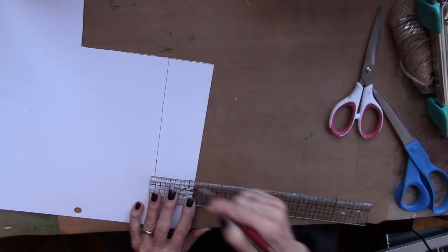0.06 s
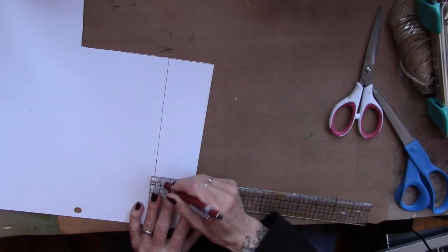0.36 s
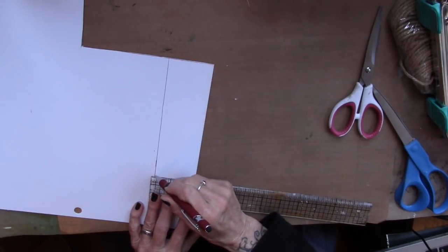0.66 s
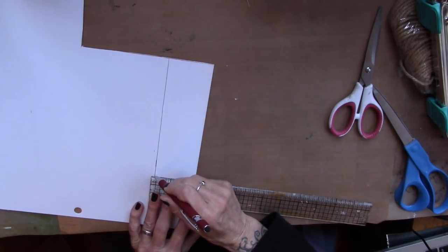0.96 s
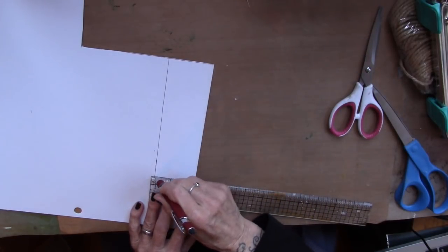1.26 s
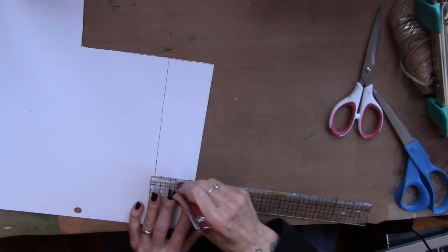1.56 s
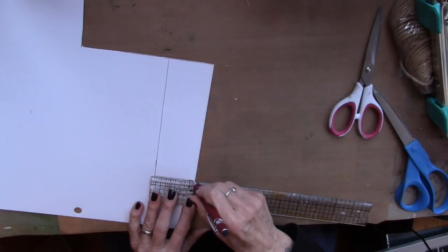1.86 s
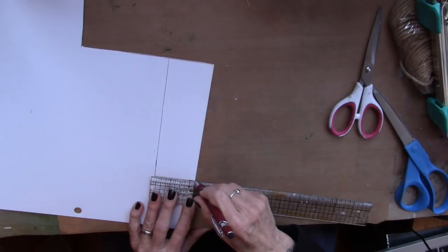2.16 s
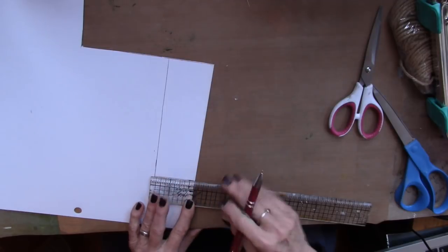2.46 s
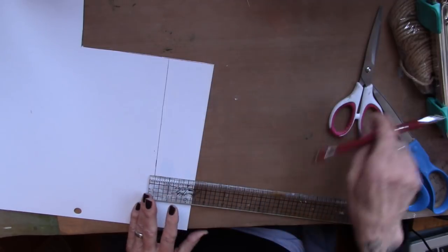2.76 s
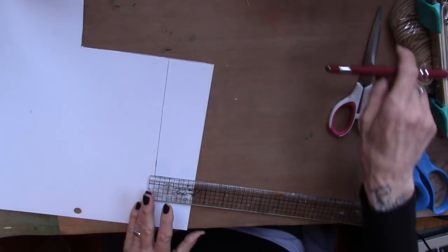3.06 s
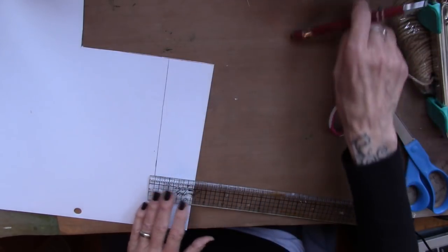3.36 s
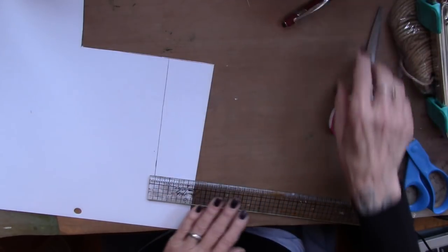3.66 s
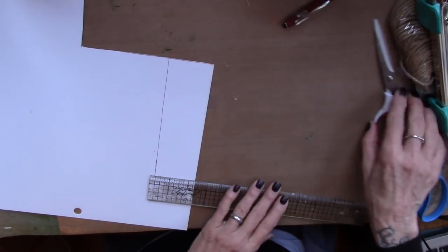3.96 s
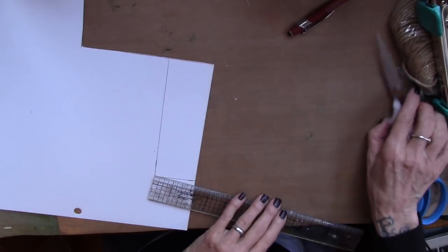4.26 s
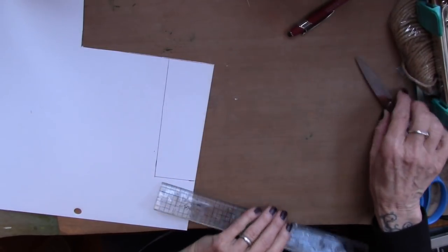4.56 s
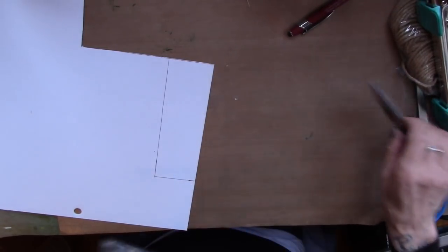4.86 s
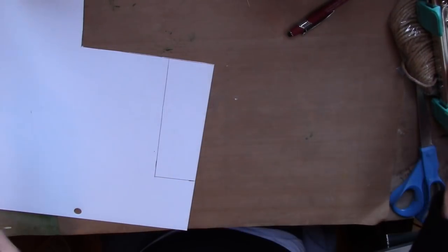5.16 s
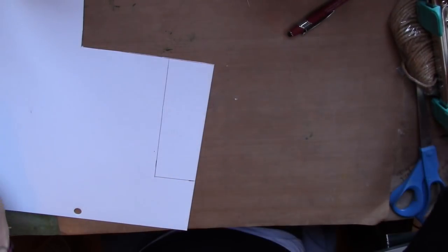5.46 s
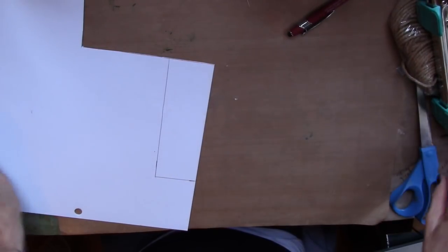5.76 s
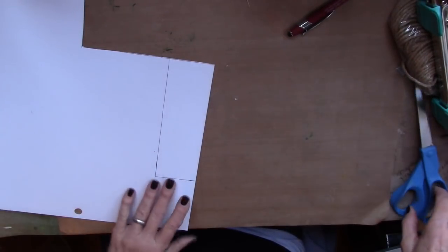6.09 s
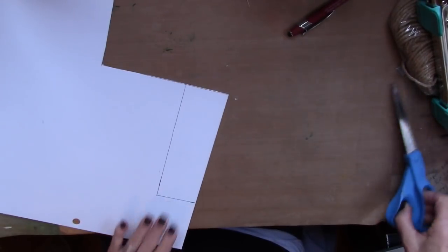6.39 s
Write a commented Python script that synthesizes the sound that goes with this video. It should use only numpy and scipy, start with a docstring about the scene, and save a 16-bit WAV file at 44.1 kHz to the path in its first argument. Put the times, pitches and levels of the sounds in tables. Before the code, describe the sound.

A pen ticks along a ruler and drops on a wooden desk, then scissors and ruler clatter down over a low room hum.

```python
"""A small room hums; close above a wooden desk come faint ticks and the rub of a fingertip on a ruler.
A pen taps along the ruler, draws, and is dropped aside, each impact exciting the modes of pen and desk.
Scissors are dragged away with a rasp of friction, clink against other tools and clatter down, and the
ruler, lifted off, falls and bounces. Last, paper is pushed across the desk with a rustle of tiny slips,
and a second pair of scissors is picked up with a few clicks."""
import sys
import numpy as np
from scipy import signal
from scipy.fft import rfft, irfft
from scipy.io import wavfile
from scipy.ndimage import uniform_filter1d, map_coordinates

SR = 44100
rng = np.random.default_rng(int(sys.argv[2]) if len(sys.argv) > 2 else 0)


def wav_record(signal):
    """Record a signal, one row per channel, as 16-bit PCM in the file named by sys.argv[1]."""
    frames = np.transpose(np.atleast_2d(signal))
    bounded = np.clip(frames, -1, 1)
    # unit amplitude maps onto the largest positive 16-bit level
    quanta = np.round(bounded * 32767).astype(np.int16)
    wavfile.write(sys.argv[1], SR, quanta)


N = 287960
TIME = np.arange(N) / SR
AGE = TIME[:SR // 2]  # time since an impact [s]

# Levels in the tables are relative.
# ventilation noise, and its diffuse share, side minus mid: (frequency [Hz], level [dB])
AIR_SPECTRUM = [(25, -62), (42, -40), (108, -2), (141, -13), (190, -11.5), (223, -15), (355, -14),
                (545, -21), (2000, -33), (2610, -35), (11300, -45.5), (16000, -55.5)]
AIR_SIDE_SPECTRUM = [(30, 10.5), (70, -30.5), (350, -11), (1400, -5.5), (10000, -27)]
# ventilation hum and a thin whine: (frequency [Hz], bandwidth [Hz], level [dB])
HUM_LINES = [(57.8, 9, -66.5), (107.47, 1.8, -58), (120.43, 2.4, -59.5), (164.8, 4.8, -62.5),
             (184.94, 4.14, -57.5), (788, 89, -66.5), (11060, 120, -86)]
# runs of faint ticks, as of a lens motor: (start [s], end [s], level [dB])
TICK_RUNS = [(0.093, 0.17, -65), (0.428, 0.73, -62.5), (0.761, 0.78, -65.5), (1.094, 1.33, -62),
             (1.692, 1.72, -66), (3.363, 3.39, -63.5), (4.117, 4.15, -50.5)]
# pen, ruler and handles tap the desk: (time [s], level [dB])
DESK_TAPS = [(0.871, -54), (1.358, -53), (1.405, -49), (1.4657, -55), (2.535, -33), (3.763, -48),
             (4.183, -29.5)]
# hand and tools knock dully on the desk: (time [s], level [dB], pitch [Hz])
DESK_KNOCKS = [(2.17, -30, 327), (2.979, -40, 392), (3.5162, -18.5, 870), (4.186, -41.5, 970),
               (4.401, -35.5, 580), (4.456, -39, 730), (5.444, -24.5, 530)]
# impacts: (time [s], level [dB], sharpness [dB], accent [Hz])
TOOL_CLICKS = [(2.164, -42, 5, 6000), (2.1712, -41, -5, 2750), (2.503, -40.5, -12.5, 2550),
               (4.212, -42, 3, 8440), (4.275, -47, 3.5, 8000), (4.307, -40, -8.5, 3000),
               (4.358, -31.5, -0.5, 2500), (4.37, -36, -8, 2800), (4.518, -34, -6.5, 2320),
               (4.606, -45, -1.5, 2900), (6.1265, -35, -3, 3413), (6.1735, -43, -3, 3070),
               (6.1885, -35.5, -4, 4100)]
PEN_BOUNCES = [(3.437, -30, -28, 2300), (3.4535, -22.5, -0.5, 2040), (3.4627, -31, 4.5, 2000),
               (3.5128, -27, -2, 2550), (3.5146, -9, -6.5, 2800), (3.5195, -29, 1, 1900)]
BLADE_CLINKS = [(5.0436, -36, -6.5, 1380), (5.2395, -43, 3, 2700), (5.3404, -33.5, -1, 3260),
                (5.409, -44, 3, 3000), (5.424, -37, -13, 2900)]
SCISSOR_BOUNCES = [(5.4505, -23.5, -3.5, 2020), (5.4535, -28.5, -11.5, 3700), (5.468, -35, -2, 2000),
                   (5.4866, -30.5, -7.5, 1900), (5.516, -30.5, -28, 1640), (5.554, -42, -33, 1200)]
RULER_BOUNCES = [(5.6103, -21, -0.5, 3100), (5.6225, -22.5, -11.5, 1380), (5.6425, -27, -24, 1310),
                 (5.6557, -24.5, -6.5, 3040), (5.7252, -24, -6.5, 1280), (5.7485, -37, -1.5, 2900)]
# sliding strokes: (peak time [s], level [dB], rise [s], fall [s], weight [dB])
PEN_STROKES = [(1.44, -61.5, 0.34, 0.23, 5.5), (1.66, -66, 0.22, 0.17, -8),
               (2.55, -47.5, 0.094, 0.052, -5.5)]
DRAG_STROKES = [(2.98, -51.5, 0.022, 0.073, 11), (3.79, -53.5, 0.053, 0.35, -12),
                (3.915, -40.5, 0.085, 0.06, -12.5), (3.98, -46.5, 0.21, 0.028, 5.5),
                (4.19, -44, 0.23, 0.23, -6.5), (4.42, -47.5, 0.089, 0.085, -4.5),
                (4.615, -52, 0.19, 0.074, 2), (4.79, -53.5, 0.041, 0.025, -9)]
BLADE_STROKES = [(5.07, -56, 0.076, 0.1, -25), (5.243, -45, 0.004, 0.16, -27),
                 (5.31, -42.5, 0.068, 0.054, -17), (5.365, -45, 0.017, 0.2, -18),
                 (5.43, -38, 0.058, 0.091, -11)]
PAPER_STROKES = [(6.125, -45.5, 0.055, 0.05, -3.5), (6.195, -41, 0.094, 0.2, -6),
                 (6.248, -44, 0.083, 0.041, -7), (6.355, -46.5, 0.09, 0.076, -7.5)]
# normal modes before contact damping: (frequency [Hz], level [dB], T60 [s])
DESK_MODES = [(171, -5.5, 0.3), (247.4, 2.5, 0.11), (316, 2, 0.1385), (397.4, -0.5, 0.033),
              (530, -5.5, 0.027), (680, -3.5, 0.024), (797, 0.5, 0.058), (886, 5, 0.019)]
PLASTIC_MODES = [(1070, -2, 0.053), (1530, -16, 0.097), (2067, -7.5, 0.045), (2507, -5, 0.17),
                 (2750, -6, 0.048), (3410, 1, 0.011), (5880, -15, 0.016)]
PEN_MODES = [(1740, -6.5, 0.037), (2040, -8.5, 0.0232), (2300, 5, 0.016), (2790, 4, 0.0092),
             (3190, -7.5, 0.031), (5910, -8.5, 0.014), (6750, 2, 0.006), (7700, -0.5, 0.0089)]
BLADE_MODES = [(1352, -6.5, 0.18), (1385, -3.5, 0.24), (2175, -4, 0.02), (2729, 0, 0.04), (2900, -2, 0.022),
               (3840, -9, 0.02), (6740, -9, 0.035), (7542, -7.5, 0.04), (8366, -10, 0.035),
               (9211, -11, 0.045)]
RULER_MODES = [(1112, -4.5, 0.12), (1291, -3.5, 0.08), (1361, -4, 0.07), (1740, 2, 0.05), (1902, -1, 0.04),
               (2288, -2, 0.03), (2740, -1, 0.025), (3305, 2, 0.012), (3800, -2, 0.012), (8500, -1, 0.005)]
# friction noise of tools and of paper: (frequency [Hz], level [dB])
DRAG_SPECTRUM = [(120, -37), (200, -11.5), (320, 4.5), (538, -4), (763, -9), (1050, -15), (3070, -20.5),
                 (8120, -28.5), (11000, -32.5), (16000, -44.5)]
PAPER_SPECTRUM = [(120, -12), (200, 2), (311, 6), (791, -5), (916, -14.5), (4000, -16), (6800, -11.5),
                  (9000, -15), (12200, -19), (16000, -35)]
# resonance of the contact travelling along a blade: (time [s], frequency [Hz])
SQUEAL_PATH = [(5.25, 2700), (5.31, 3045), (5.39, 3330), (5.44, 3060)]
# decay of the reverberation: (frequency [Hz], T60 [s])
REVERB_T60 = [(150, 0.46), (800, 0.28), (3000, 0.3), (7000, 0.3), (15000, 0.16)]
# spectrum of the reverberation: (frequency [Hz], level [dB])
REVERB_SPECTRUM = [(150, -9.5), (700, -7), (1500, -10), (4500, -13), (14000, -11)]


def from_db(db):
    """Amplitude grows tenfold for every 20 dB."""
    return 10 ** (np.asarray(db) / 20)


def rms_one(x):
    """Normalisation to unit mean power."""
    return x / np.sqrt(np.mean(x ** 2) + 1e-20)


def peak_one(x):
    """Normalisation to unit power in the loudest two milliseconds."""
    return x / np.sqrt(uniform_filter1d(x ** 2, size=88, mode="constant").max() + 1e-20)


def at_hz(points, hz):
    """Interpolation on a log-frequency axis."""
    f, value = np.transpose(points)
    return np.interp(np.log(np.maximum(hz, 1)), np.log(f), value)


def cut(x, hz, kind, order=2):
    """Causal Butterworth filtering."""
    return signal.sosfilt(signal.butter(order, hz, kind, fs=SR, output="sos"), x)


def colour(x, spectrum):
    """Filtering by multiplication of spectra."""
    return irfft(rfft(x) * from_db(at_hz(spectrum, np.fft.rfftfreq(N, 1 / SR))), N)


def registers(x, low_hz=1000, high_hz=4500):
    """Band splitting into middle, low and high ranges."""
    middle = cut(x, [low_hz, high_hz], "band", order=3)
    return middle, cut(x, low_hz, "low", order=4), cut(x, high_hz, "high", order=4)


def add(track, s, sound):
    """Superposition: a sound joins the track at time s."""
    at = int(s * SR)
    track[at:at + len(sound)] += sound[:N - at]


def air():
    """Broadband noise: the steady rush of ventilation."""
    return from_db(-52) * rms_one(colour(rng.standard_normal(N), AIR_SPECTRUM))


def hum():
    """Narrowband noise: each line wavers at a rate set by its bandwidth."""
    hz, out = np.fft.rfftfreq(N, 1 / SR), np.zeros(N)
    for centre, width, db in HUM_LINES:
        line = rfft(rng.standard_normal(N)) / (1 + (2 * (hz - centre) / width) ** 2)
        out += from_db(db) * rms_one(irfft(line, N))
    return out


def ticks(centre_hz=2036, width_hz=400, period_s=0.0667, lift_db=4.5, first_lift_db=7.5):
    """A damped resonance is excited periodically, hardest at the start of a run."""
    out = np.zeros(N)
    pip = peak_one(AGE * np.exp(-np.pi * width_hz * AGE) * np.sin(2 * np.pi * centre_hz * AGE))
    for start, end, db in TICK_RUNS:
        for k, s in enumerate(np.arange(start, end, period_s)):
            add(out, s, from_db(db + lift_db + first_lift_db * (k == 0)) * pip)
    return out


def slips(per_s, grain_db, uneven_db=2.5):
    """Stick-slip friction: random impulses whose force wavers as surfaces catch and let go."""
    sizes = rng.standard_normal(N) * from_db(grain_db * np.minimum(rng.exponential(1, N), 3))
    catching = rms_one(cut(rng.standard_normal(N), 24, "low"))
    return (rng.random(N) < per_s / SR) * sizes * from_db(uneven_db * catching)


def swell(s, db, rise_s, fall_s, swing_db=20):
    """Exponential growth and decay: a stroke moves by swing_db over its rise and its fall."""
    away = np.maximum((s - TIME) / rise_s, (TIME - s) / fall_s)
    return from_db(db - swing_db * np.minimum(away, 10))


def finger_rub():
    """Stick-slip of skin on the plastic ruler gives a soft, narrowband rub."""
    rub = rms_one(cut(slips(per_s=1100, grain_db=-1), [540, 750], "band"))
    return swell(s=0.25, db=-48, rise_s=0.044, fall_s=0.041) * rub


def dying_noise(t60_at, db_at=lambda hz: 0):
    """Modal overlap: countless modes merge into noise, each band decaying at its own rate."""
    edges = np.geomspace(90, 18000, num=13)
    white, hz = rfft(rng.standard_normal(len(AGE))), np.fft.rfftfreq(len(AGE), 1 / SR)
    out = 0
    for low, high in zip(edges, edges[1:]):
        centre = np.sqrt(low * high)
        band = irfft(white * (hz >= low) * (hz < high), len(AGE))
        band *= np.exp(-np.log(1000) * AGE / t60_at(centre))
        band_share = np.sqrt(2 * (high - low) / SR / len(AGE))
        out += rms_one(band) * band_share * from_db(db_at(centre))
    return out


def ring(modes, held_t60, scatter_db=2):
    """Free vibration is a sum of damped modes; a support adds its decay rate to theirs."""
    hz, db, t60 = np.transpose(modes)[:, :, None]
    strength = from_db(db + scatter_db * rng.standard_normal(hz.shape)) * rng.choice([-1, 1], hz.shape)
    decay = np.exp(-np.log(1000) * AGE * (1 / t60 + 1 / held_t60))
    return np.sum(strength * np.sin(2 * np.pi * hz * AGE) * decay, axis=0)


def accent(x, centre_hz, band_db, octaves=0.35):
    """Selective excitation: the point of contact favours the modes around one pitch."""
    edges = centre_hz * 2 ** (octaves * np.array([-.5, .5]))
    return x + from_db(band_db) * cut(x, edges, "band", order=1)


def desk(tilt_db, rise_s=0.0024):
    """The desk is a sounding board; hard contact tilts its modes upward by tilt_db per octave."""
    modes = [(hz, db + tilt_db * np.log2(hz / DESK_MODES[0][0]), t60) for hz, db, t60 in DESK_MODES]
    wood = peak_one(cut(dying_noise(lambda hz: .07), [180, 1000], "band", order=3))
    tone = peak_one(ring(modes, held_t60=0.43, scatter_db=0))
    return peak_one((tone + from_db(-5) * wood) * (1 - np.exp(-AGE / rise_s)))


def impacts(rows, modes, held_t60, crunch_t60, crunch_db, snap_db, accent_db, top_hz, desk_db, tilt_db):
    """Impulse response: a tool snaps, crunches and rings; the desk answers slowly, in proportion."""
    out = np.zeros(N)
    for s, db, sharpness_db, accent_hz in rows:
        crunch = dying_noise(lambda hz: crunch_t60 * (hz / 3000) ** -.35)
        tool = peak_one(ring(modes, held_t60)) + from_db(crunch_db) * peak_one(crunch)
        # rough surfaces meet at several points within a millisecond
        tool += from_db(snap_db) * peak_one(rng.standard_normal(len(AGE)) * np.exp(-AGE / 0.00093))
        # a sharper contact is shorter and reaches higher
        reach_hz = min(top_hz * 2 ** (0.22 * sharpness_db), 18000)
        body, _, crack = registers(cut(accent(tool, accent_hz, accent_db), reach_hz, "low"))
        blow = peak_one(body) + from_db(sharpness_db) * peak_one(crack)
        add(out, s, from_db(db) * (blow + from_db(desk_db) * desk(tilt_db)))
    return out


def taps(sharpness_db=-6, accent_hz=1700):
    """Hard contact: tapping plastic drives the upper modes of the desk."""
    rows = [(s, db, sharpness_db, accent_hz) for s, db in DESK_TAPS]
    return impacts(rows, PLASTIC_MODES, held_t60=0.055, crunch_t60=0.037, crunch_db=3, snap_db=-9,
                   accent_db=7.5, top_hz=11800, desk_db=-0.5, tilt_db=19)


def slide(strokes, friction, hiss_db):
    """Incoherent strokes add in power; weight on the desk raises rumble and dulls hiss."""
    power = 0
    for s, db, rise_s, fall_s, weight_db in strokes:
        shares = from_db([[0], [weight_db], [hiss_db - 0.84 * weight_db]])  # rasp, rumble, hiss
        power += (shares * swell(s, db, rise_s, fall_s)) ** 2
    return sum(rms_one(part) * gain for part, gain in zip(registers(friction), np.sqrt(power)))


def pen_line():
    """Sliding friction: the pen draws a line, then scrapes off the ruler."""
    return slide(PEN_STROKES, colour(slips(per_s=3000, grain_db=-0.5), DRAG_SPECTRUM), hiss_db=-11.5)


def clicks():
    """Weak coupling: light clicks of tool on tool, and a few sharp nail ticks, hardly move the desk."""
    return impacts(TOOL_CLICKS, PLASTIC_MODES, held_t60=0.018, crunch_t60=0.032, crunch_db=9,
                   snap_db=-24, accent_db=4.5, top_hz=9300, desk_db=-8.5, tilt_db=-3)


def knocks(desk_low_hz=151):
    """Soft contact is a low-pass filter: a thud and a dull brush, with little above their pitch."""
    out = np.zeros(N)
    for s, db, pitch_hz in DESK_KNOCKS:
        brush = from_db(9) * peak_one(dying_noise(lambda hz: .05))
        thud = accent(desk(tilt_db=2.5) + brush, pitch_hz, band_db=-0.5)
        add(out, s, from_db(db) * peak_one(cut(thud, [desk_low_hz, 1.47 * pitch_hz], "band", order=4)))
    return out


def drag():
    """Fine slips merge into a swish as scissors, ruler and sleeve glide over wood."""
    friction = colour(slips(per_s=14000, grain_db=1, uneven_db=1.5), DRAG_SPECTRUM)
    return slide(DRAG_STROKES, friction, hiss_db=-11.5)


def pen_drop():
    """Each rebound of the pen excites its modes anew."""
    return impacts(PEN_BOUNCES, PEN_MODES, held_t60=0.0724, crunch_t60=0.17, crunch_db=-22, snap_db=2,
                   accent_db=4.5, top_hz=13270, desk_db=-14.5, tilt_db=2)


def chatter(bounces, delay_s, fall_s, level_db, weight_db):
    """Each bounce sets off a short stroke in proportion to its amplitude."""
    return [(s + delay_s, db + level_db, delay_s, fall_s, weight_db) for s, db, *_ in bounces]


def skids():
    """Friction follows impact: the pen rolls and the scissors skid."""
    pen = chatter(PEN_BOUNCES, delay_s=0.024, fall_s=0.09, level_db=-32.5, weight_db=4)
    scissors = chatter(SCISSOR_BOUNCES, delay_s=0.0049, fall_s=0.1, level_db=-12, weight_db=-2.5)
    return slide(pen + scissors, colour(slips(per_s=4300, grain_db=-7), DRAG_SPECTRUM), hiss_db=-22.5)


def scraped(modes, rasp_db, top_hz, waver_s=0.00005, waver_hz=40):
    """Forced vibration: friction keeps a tool's modes singing; a changing grip wavers their pitch."""
    friction = slips(per_s=4900, grain_db=-2)
    driven = signal.fftconvolve(friction, ring(modes, held_t60=.15, scatter_db=0))
    warp = waver_s * rms_one(cut(rng.standard_normal(N), waver_hz, "low", order=4))
    singing = rms_one(map_coordinates(driven, [(TIME + warp) * SR], order=3))
    rasp = from_db(rasp_db) * rms_one(colour(friction, DRAG_SPECTRUM))
    return cut(singing + rasp, top_hz, "low")


def blade_scrape(width_hz=390):
    """Steel on steel: the blades sing, and a resonance follows the moving contact point."""
    centre_hz = np.interp(TIME, *np.transpose(SQUEAL_PATH))
    carrier = np.cos(2 * np.pi * np.cumsum(centre_hz) / SR)
    squeal = rms_one(cut(rng.standard_normal(N), width_hz / 2, "low") * carrier)
    blades = rms_one(scraped(BLADE_MODES, rasp_db=6, top_hz=11400))
    return slide(BLADE_STROKES, blades + from_db(-12) * squeal, hiss_db=-20.5)


def clinks():
    """Light damping: free blades ring on after a touch."""
    return impacts(BLADE_CLINKS, BLADE_MODES, held_t60=0.44, crunch_t60=0.079, crunch_db=-1.5,
                   snap_db=-10, accent_db=-4.5, top_hz=7500, desk_db=-24, tilt_db=-2)


def clatter():
    """Contact damping: the desk stills the blades as the scissors land."""
    return impacts(SCISSOR_BOUNCES, BLADE_MODES, held_t60=0.051, crunch_t60=0.049, crunch_db=30,
                   snap_db=-4, accent_db=7, top_hz=7660, desk_db=-7.5, tilt_db=0.5)


def ruler_drop():
    """Impulsive excitation: the ruler rings briefly at each bounce."""
    return impacts(RULER_BOUNCES, RULER_MODES, held_t60=0.08, crunch_t60=0.043, crunch_db=-6,
                   snap_db=-5, accent_db=6.5, top_hz=11500, desk_db=-9.5, tilt_db=13)


def ruler_rattle():
    """Friction makes the ruler rasp after each bounce."""
    strokes = chatter(RULER_BOUNCES, delay_s=0.011, fall_s=0.068, level_db=-13.5, weight_db=-7.5)
    return slide(strokes, scraped(RULER_MODES, rasp_db=24, top_hz=8000), hiss_db=-18.5)


def paper():
    """Stick-slip makes the sheet rustle as the hand pushes it."""
    friction = colour(slips(per_s=5800, grain_db=0.5), PAPER_SPECTRUM)
    return slide(PAPER_STROKES, cut(friction, 18000, "low"), hiss_db=-15)


def room(x, build_s=0.0031):
    """Reverberation: convolution with diffuse reflections that build up, then decay."""
    tail = dying_noise(lambda hz: at_hz(REVERB_T60, hz), lambda hz: at_hz(REVERB_SPECTRUM, hz))
    return signal.fftconvolve(x, tail * np.clip(AGE / build_s, 0, 1))[:N]


def scene():
    """All sources superpose at two closely spaced microphones."""
    hits = taps() + clicks() + pen_drop() + clinks() + clatter() + ruler_drop()
    direct = hits + knocks() + drag() + blade_scrape() + skids() + ruler_rattle()
    direct += paper() + pen_line() + finger_rub() + ticks()
    mid = direct + room(direct) + air() + hum()
    # the channels differ by diffuse sound and by the pressure gradient, strongest for direct hits
    diffuse = from_db(-38) * room(direct) + colour(air(), AIR_SIDE_SPECTRUM)
    side = diffuse + np.gradient(from_db(-44) * mid + from_db(-17.5) * hits)
    return np.array([mid + side, mid - side])


def record(dry, bass_hz=43, top_hz=15900):
    """Band limiting and soft saturation: deep bass and top are cut, the highest peaks rounded."""
    rounded = np.tanh(cut(dry, bass_hz, "high"))
    return signal.sosfilt(signal.ellip(12, .1, 90, top_hz, fs=SR, output="sos"), rounded)


dry = scene()
out = record(dry)
wav_record(out)
```